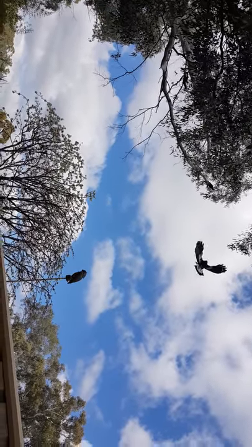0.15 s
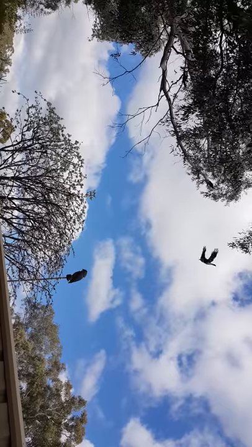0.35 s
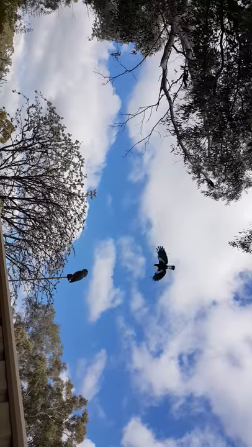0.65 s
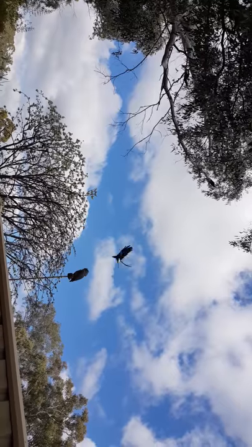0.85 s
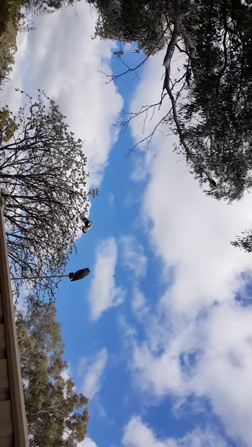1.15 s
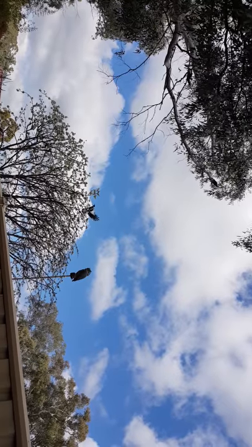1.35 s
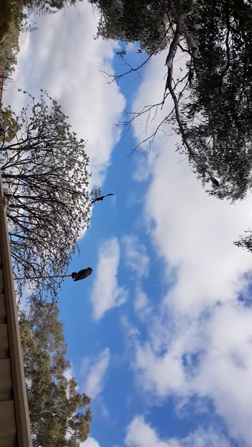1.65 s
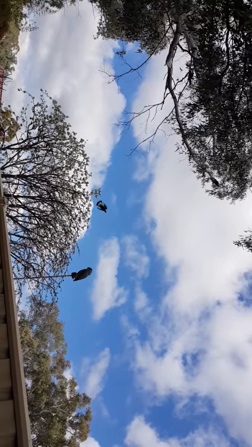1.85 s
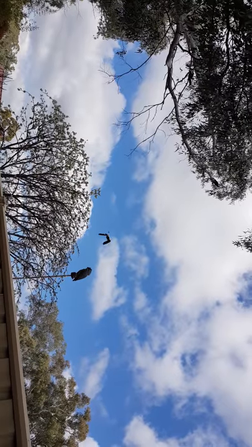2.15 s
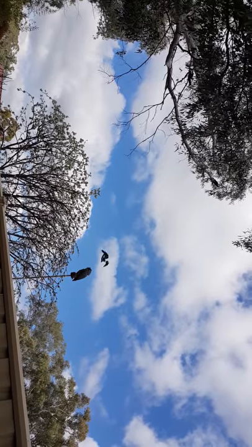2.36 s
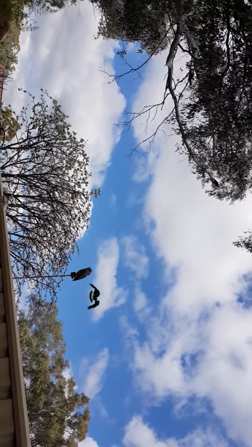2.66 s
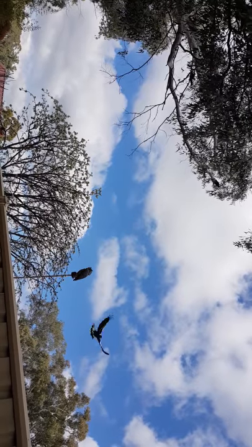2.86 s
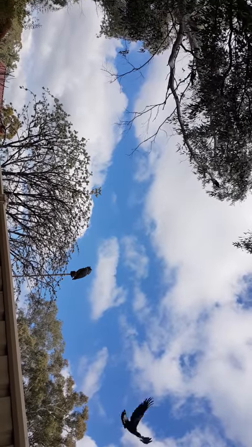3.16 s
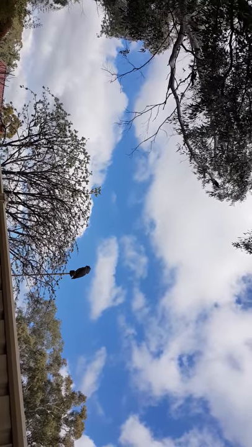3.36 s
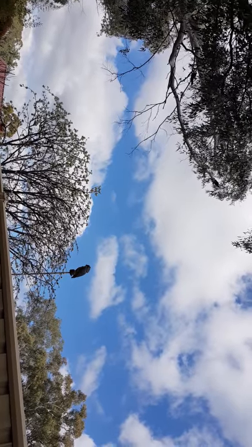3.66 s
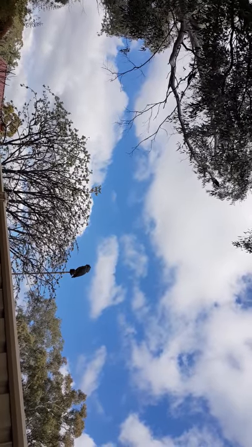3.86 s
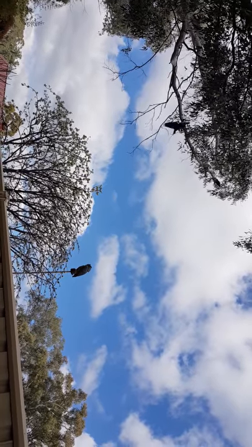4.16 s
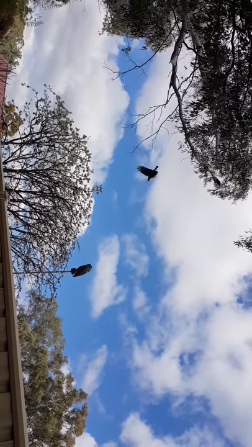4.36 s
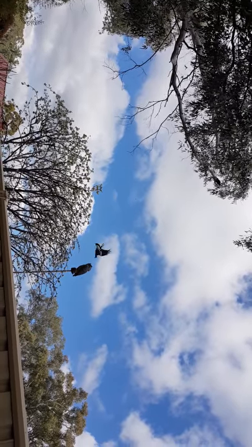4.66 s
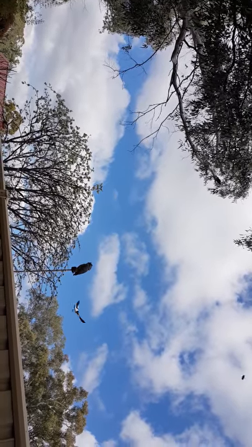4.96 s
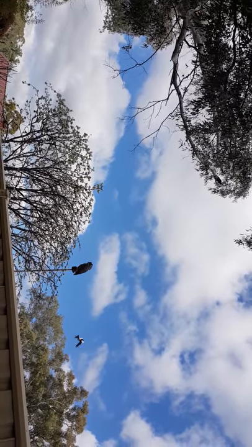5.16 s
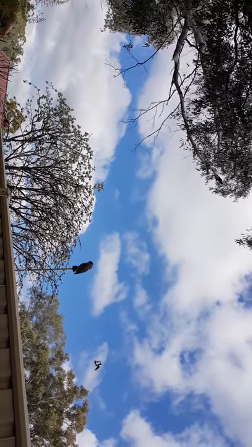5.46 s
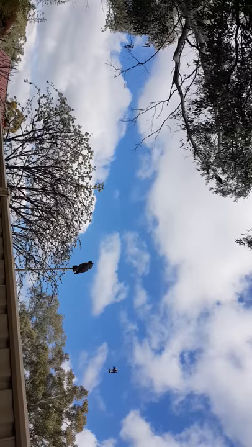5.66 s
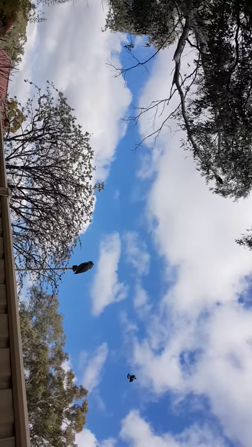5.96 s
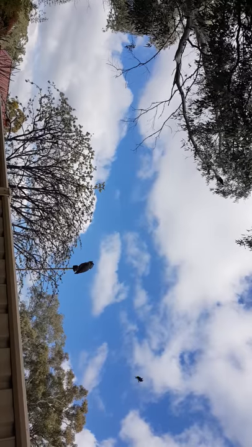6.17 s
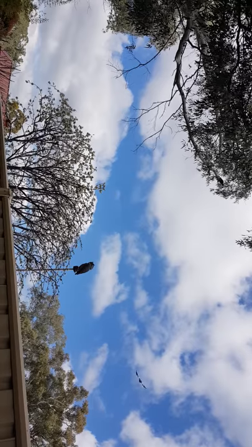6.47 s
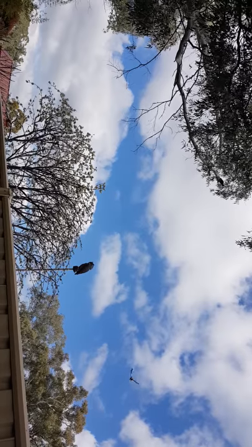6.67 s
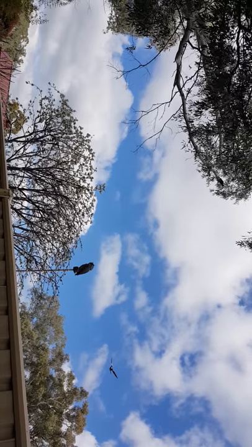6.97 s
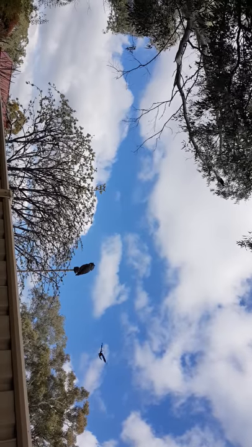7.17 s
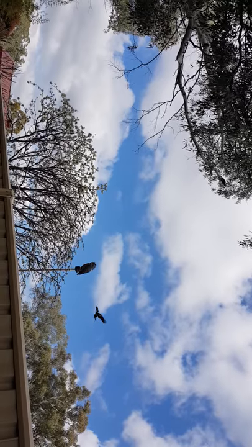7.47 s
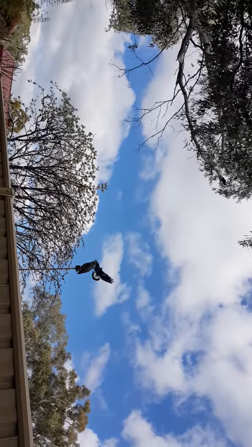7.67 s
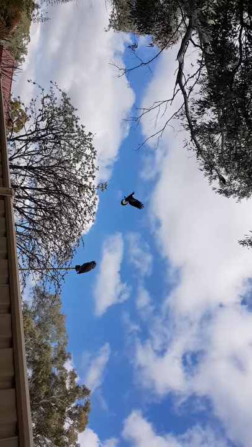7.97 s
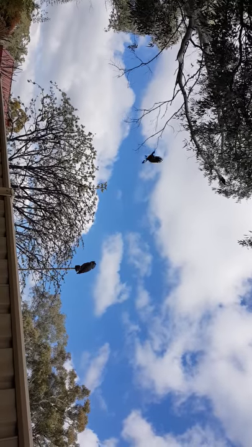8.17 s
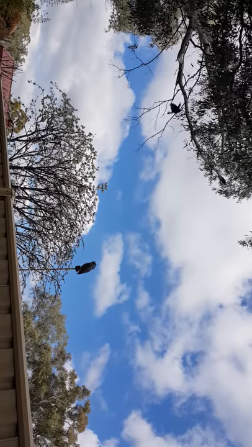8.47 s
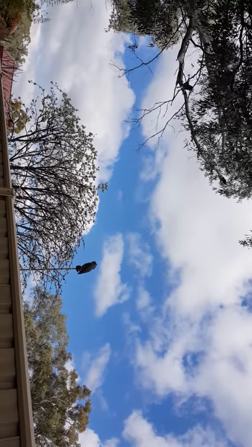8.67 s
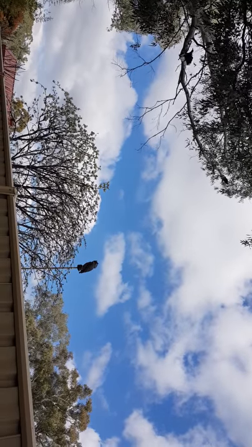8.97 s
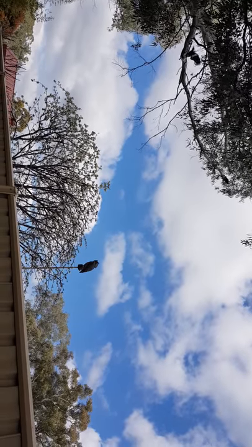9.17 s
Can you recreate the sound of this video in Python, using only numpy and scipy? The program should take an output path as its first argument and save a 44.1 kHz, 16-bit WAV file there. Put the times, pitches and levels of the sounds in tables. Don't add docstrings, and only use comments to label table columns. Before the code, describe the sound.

A suburban backyard with magpies swooping at a decoy, about nine seconds. A harsh call is already sounding at the start, with a higher answer at 0.3. Raspy, fluttering scolds near 1 kHz follow at 0.8 and 1.2, then a tangle of short wailing whistles and rough squawk from 1.6 to 2.1. A beak snaps on the left at 2.6; strong calls come at 2.7 and, loudest, 3.2, with another at 3.5. More scolds run from 4.3 to 5.8, with low wind puffs around 4.9 to 5.9. A clearer call at 5.9 overlaps a small bird's dry ticking until 6.4; longer, lower calls follow at 6.4 and 6.8, and ticking returns at 7.1. A dull beak clap at 7.8 leads into overlapping scolds until 8.7, then mostly quiet traffic hum, with tiny ticks near 9.1. Light echoes from houses and trees surround the calls.

```python
import sys
import numpy as np
from scipy import signal
from scipy.fft import rfft, irfft
from scipy.io import wavfile
from scipy.ndimage import uniform_filter1d

SR = 44100
rng = np.random.default_rng(int(sys.argv[2]) if len(sys.argv) > 2 else 0)


def bounce(signal):
    frames = np.transpose(np.atleast_2d(signal))
    limited = np.clip(frames, -1, 1)
    pcm = np.round(limited * 32767).astype(np.int16)
    wavfile.write(sys.argv[1], SR, pcm)


def boost_factor(decibels):
    exponent = np.asarray(decibels, float) / 20
    return 10 ** exponent


N = 410995
CUTOFF_HZ = 17200


def rms_one(x):
    return x / np.sqrt(np.mean(x ** 2) + 1e-20)


def at_hz(points, hz):
    table_hz, value = np.array(points)[:, 0], np.array(points)[:, 1]
    return np.interp(np.log(hz), np.log(table_hz), value)


def in_time(rows, t):
    time_s, *columns = np.transpose(rows)
    return [np.interp(t, time_s, c) for c in columns]


def drift(rate_hz, size, count=1):
    r = np.exp(-40 * np.pi * rate_hz / SR)
    coarse = rng.standard_normal((count, max(size, SR // 2) // 20 + 502))
    slow = signal.lfilter([1], [1, -2 * r, r * r], coarse)
    slow = slow[:, 500:size // 20 + 502]
    at = np.arange(size) / 20
    return np.array([np.interp(at, np.arange(len(row)), rms_one(row)) for row in slow]).squeeze()


def band(x, lo_hz, hi_hz):
    return signal.sosfilt(signal.butter(2, [lo_hz, hi_hz], "band", fs=SR, output="sos"), x)


def high(x, order, hz):
    return signal.sosfilt(signal.butter(order, hz, "high", fs=SR, output="sos"), x)


def low_pass(x, order, hz):
    return signal.sosfilt(signal.butter(order, hz, fs=SR, output="sos"), x)


def shaped_noise(spectrum, channels):
    hz = np.fft.rfftfreq(N, 1 / SR) + 1
    return rms_one(irfft(rfft(rng.standard_normal((channels, N))) * boost_factor(at_hz(spectrum, hz)), N))


def add(out, x, start_s, pan_db=0, lag=0, reach=500):
    treble = high(x, 3, 3000)
    for side, sign in enumerate((1, -1)):
        first = round(start_s * SR) + max(round(sign * lag), 0)
        delays = [0, *rng.integers(40, int(reach), 3)]
        scattered = boost_factor(-5) * rng.choice([-1, 1], (3, 1)) * treble
        for delay, sound in zip(delays, [x, *scattered]):
            i = first + delay
            out[side, i:i + len(x)] += boost_factor(sign * pan_db / 2) * sound[:N - i]


def fades(t, rise_s, fall_s):
    rise = np.clip((t - t[0]) / rise_s, 0, 1) if t[0] > 0 else 1
    return rise * np.clip((t[-1] - t) / fall_s, 0, 1)


# start_s, length_s, crest_db, crest_hz, arch_depth_hz
ARCHED = [
    (0.845,0.22,-21,1064,53),
    (1.235,0.19,-23.5,1074,18),
    (1.982,0.19,-21,1070,26),
    (2.74,.19,-16,1093,67),
    (3.164,0.19,-12.5,1104,22.5),
    (4.339,0.15,-22.5,1038,-40),
    (4.654,.19,-23,971,15.5),
    (5.011,0.26,-21,1029,22.5),
    (6.441,.27,-24.5,979.4,22.5),
    (8.083,0.23,-20.5,998,45.5),
]
# start_s, length_s, crest_db, from_hz, to_hz
FALLING = [(-.11,.2,-22,1171,1054),(0.284,0.16,-28,1319,1075),(1.25,0.2,-34.5,1291,1181),(1.58,0.21,-37,1017,748),(3.518,0.24,-25.5,980.6,964.4),
           (5.308,0.31,-32.5,993.6,840.4),(5.469,0.29,-33,1024,952),(6.829,.31,-33.5,1015,860),(7.817,0.24,-28,956,910),(8.309,0.24,-28,927.6,888),(8.566,0.18,-34,823,764)]
# start_s, length_s, crest_db, from_hz, to_hz
FADING = [
    (0,0.068,-26,956,892),
    (.285,0.12,-29,1580,1294),
    (.83,0.16,-29,956,802),
    (3.18,.21,-26.5,940,806),
    (6.2,0.32,-42,999,983),
    (8.04,0.31,-30.5,998,791),
    (3.97,0.3,-57,985,964),
]
# start_s, length_s, crest_db, from_hz, to_hz
LEAD_IN = [
    (.69,0.15,-37.5,1045,975),
    (1.2,0.071,-44,980,909),
    (3.09,0.11,-35,981,1037),
    (4.275,.07,-47,886,1000),
    (4.61,0.052,-38,888,978),
]
# start_s, length_s, crest_db, from_hz, to_hz
CLEAR = [
    (5.94,.265,-29.5,1051,989.6),
]
# flutter_per_s, shake_depth, upper_overtones_db, top_hiss_db, beak_resonance_hz
ARCHED_VOICE = [(117.8,0.573,-8.5,-39,4320),(114.1,0.55,-9,-48,4300),(127,0.62,-6.5,-21,4180),(124.6,0.63,-8.5,-18.5,4310),(135.7,0.757,-10,-23,4430),
                (142.3,0.71,-12,-23,4450),(135.3,0.53,-6.5,-37,4370),(127,0.61,-6.5,-27,4380),(128.1,0.6,-5.5,-25,4400),(127,0.65,-6.5,-27,4520)]
FALLING_VOICE = [(137.8,0.55,-4.5,-18.5,4610),(128.5,0.86,-4.5,-24.5,4570),(129.6,1,1,-13.5,4480),(146.3,0.59,1.5,-3,4440),(134,0.53,-4.5,-20,4410),
                 (142.6,0.64,-1.5,-19,4370),(117.8,0.61,-12.5,-41,4700),(159,0.69,-3.5,-17.5,4110),(135.2,0.57,-4.5,-23.5,4230),(124.46,0.58,-3,-20,4260),(129.3,0.74,1,-18,3900)]
FADING_VOICE = [(150,0.83,-5,-20,4550),(123,1,-26,-52,6400),(130.8,0.91,3,-15.5,3630),(134.7,0.68,0,-20,5000),(161,0.52,-10.5,-49,4400),(123.4,0.88,1.5,-8.5,3800),(127,0.79,-22,-38,4200)]
LEAD_IN_VOICE = [(169,0.61,-6.5,-15,4760),(138,1,-6,-65,4050),(181,0.61,-7.5,-24,4070),(144,1,-7.5,-37,3360),(136.5,0.76,-1,-28,4000)]
CLEAR_VOICE = [(120.7,0.32,-13,-24.5,4650)]
# beak_opens_from_below_hz, upper_tilt_db, top_hiss_tilt_db, third_partial_db
ARCHED_SWEEP = [(800,-1.5,-7,-0.5),(100,0,0.5,-0.5),(200,-1,-1.5,0.5),(200,1,2,-1.5),(200,0,-2,1),(200,2,11,1.5),(-300,0,3,-3),(500,1,4,8),(900,-3.5,-2.5,-1),(205,-3.5,-5,0)]
FALLING_SWEEP = [(100,1.9,5,-4.5),(100,0.5,23,0.5),(100,1.3,18,-0.5),(100,0.78,8.5,-3.5),(-200,-0.24,2.5,-3),(101,-0.41,-3,3),(105,0.14,-2,-1.5),(202,-0.012,-1.5,2),(-200,-1,-4,-2.5),(-200,0.5,1.5,-1.5),(102,1.1,3.5,4)]
FADING_SWEEP = [(100,0.5,0.45,4),(100,0.5,0.5,-9),(100,0.43,0.5,1),(100,1,0.5,0.5),(100,0.5,0.5,0.5),(100,0.66,0.5,3),(100,0.5,0.65,0.5)]
LEAD_IN_SWEEP = [(-300,0.38,0.71,0.69),(100,0.5,0.5,0.5),(100,0.5,0.5,0.5),(100,0.5,0.5,0.5),(100,-2.9,-2,0.46)]
CLEAR_SWEEP = [(102,-0.73,2.6,-1.7)]
# share_of_length, level_db against the crest
ARCHED_BREATH = [(0,-13),(.25,-3),(0.631,-2),(0.869,-4.5),(1,-7)]
FALLING_BREATH = [(0,-8),(0.222,-2.5),(.52,3.5),(0.842,-2),(0.998,-16)]
FADING_BREATH = [(0,2.5),(.15,-1.5),(.3,-1),(.75,-6),(1,-13)]
LEAD_IN_BREATH = [(0,-24),(.28,-1),(.7,6.5),(.9,5),(1.002,15)]
CLEAR_BREATH = [(0,-8.5),(.38,3.5),(0.55,2),(.88,1.5),(1,-16)]
# shoulder_share, shoulder_db, last_hold_share, last_hold_db
ARCHED_LEAN = [(0.4,-2,0.77,-0.5),(0.239,-2,0.79,-0.5),(0.24,-6.5,0.76,-3.5),(0.25,-4,.9,-2.5),(0.33,-4.5,.9,-3.5),(0.155,-4,0.736,-4.5),(0.164,0.5,.82,-2),(0.26,-5.5,0.8,-3),(0.26,-4,.85,-3),(.25,-2.5,0.81,-1.5)]
FALLING_LEAN = [(.22,-2,.86,-1.1),(0.246,0.5,.88,-1),(0.23,2.5,.85,-4.5),(0.36,-1.5,.85,-3.5),(0.45,0.5,0.96,-2.2),(0.305,3,.88,-1),(0.218,6,.92,1),(0.301,2.5,.9,-0.5),(.3,0,.86,0),(0.274,1,.85,0.2),(0.24,1.5,.88,2)]
# start_db, crest_share
ARCHED_ONSET = [(-6,0.58),(-19,.6),(-13,0.625),(-18,.6),(-13,0.61),(-12,0.58),(-11,0.44),(-21,0.71),(-16,0.6),(-10,0.66)]
FALLING_ONSET = [(-11,0.66),(-6,0.55),(-7,.52),(-1,0.36),(-10.5,0.67),(-9.5,.5),(-3,.55),(-7,.5),(-14.5,0.52),(-9,.55),(-2,.6)]
ARCHED_FIRST_DB = [-2,1,0.5,-3.5,-2,0.5,-2.5,2,1,-1.5]
FALLING_FIRST_DB = [-1,-2.5,.5,-9.5,-2.5,1.5,-3,0.5,.5,-1.5,-2]
FADING_FIRST_DB = [-5.5,3,4.5,-2.5,-14,5,-14]
# time_s, left_over_right_db, left_lag_samples
FIRST_BIRD = [(0,1,1),(.69,1.5,-2),(.83,0,1),(1.2,0,0),(1.98,0,0),(2.74,-2,6),(3.09,-4,12),(3.165,-4,12),(3.18,-1,4),(3.97,-1,11),(4.34,-1,11),(4.61,0,3),(5.0,-.5,5),(5.94,-3,11),(6.2,-3,10),(6.44,-2.3,4),(8.04,1,-2),(8.086,-1,4)]
SECOND_BIRD = [(0,1,1),(.285,.5,1),(1.25,0,0),(1.58,0,-1),(3.52,1,-8),(5.31,.3,-4),(5.47,1,12),(6.83,1.3,-3),(7.82,1.5,-1),(8.31,-.5,-7),(8.565,3,-10)]


def scolding():
    out = np.zeros((2, N))
    arch_returns = 0.393
    arched = [(s, length, db, hz - depth, hz, hz - arch_returns * depth) for s, length, db, hz, depth in ARCHED]
    clear = [(*row, row[-1]) for row in CLEAR]
    arched_breaths = [leaning(ARCHED_BREATH, *own) for own in zip(ARCHED_LEAN, ARCHED_ONSET)]
    falling_breaths = [leaning(FALLING_BREATH, *own) for own in zip(FALLING_LEAN, FALLING_ONSET)]
    fading_breaths = [FADING_BREATH] * len(FADING)
    lead_in_breaths = [LEAD_IN_BREATH] * len(LEAD_IN)
    same = np.zeros(9)
    kinds = [
        (arched, ARCHED_VOICE, arched_breaths, ARCHED_SWEEP, -10, ARCHED_FIRST_DB, FIRST_BIRD),
        (slides(FALLING), FALLING_VOICE, falling_breaths, FALLING_SWEEP, -9, FALLING_FIRST_DB, SECOND_BIRD),
        (slides(FADING), FADING_VOICE, fading_breaths, FADING_SWEEP, -10.5, FADING_FIRST_DB, FIRST_BIRD),
        (slides(LEAD_IN), LEAD_IN_VOICE, lead_in_breaths, LEAD_IN_SWEEP, -7.5, same, FIRST_BIRD),
        (clear, CLEAR_VOICE, [CLEAR_BREATH], CLEAR_SWEEP, -8.5, same, FIRST_BIRD)]
    for rows, voices, breaths, sweeps, kind_db, own_db, flight in kinds:
        for row, voice, breath, sweep, lean_db in zip(rows, voices, breaths, sweeps, own_db):
            flutter, shake, *colour = voice
            first_db = kind_db + lean_db + 15 * (row[4] / 1000 - 1)
            flutter_end = flutter * (1 - 0.1008)
            path = course(breath, *row)
            sound = call(path, flutter, flutter_end, shake, 0.044 * shake, first_db, *colour, *sweep)
            pan_db, lag = in_time(flight, row[0])
            add(out, sound, max(row[0], 0), pan_db, lag)
    return out


def slides(rows):
    return [(s, length, db, a, (a + b) / 2, b) for s, length, db, a, b in rows]


def leaning(breath, lean, onset):
    start_db, crest_share = onset
    return [(0, start_db), lean[:2], (crest_share, breath[2][1]), lean[2:], breath[4]]


def course(breath, start_s, length_s, crest_db, from_hz, crest_hz, to_hz):
    share, under_db = np.transpose(breath)
    tone_hz = [from_hz - 55.9, from_hz, crest_hz, to_hz, to_hz - 57.7]
    return np.transpose([start_s + length_s * np.sort(share), tone_hz, crest_db + under_db])


# pitch_hz, level_db
THROAT = [(1300,-7.5),(1600,4.5),(2200,3.5),(2420,-5),(3200,-15),(3700,-16.5),(5500,-18),(7000,-20.5),(8300,-36),(9800,-33),(12000,-34.5),(14000,-42),(15800,-45)]
# time_s, hiss_top_hz
TOP_EDGE = [(0,14800),(.285,13900),(.84,14700),(1.6,14000),(2.0,14800),(2.74,15400),(3.17,14700),(3.52,13000),(4.65,13500),(5.0,12200),(5.3,14100),(5.94,14600),(6.44,12200),(6.83,12200),(7.82,14300),(8.31,14100),(8.56,13000)]


def call(path, flutter_from, flutter_to, shake, hoarse, first_db, upper_db, top_db, beak_hz,
         opens_hz, upper_tilt_db, top_tilt_db, third_db):
    t = np.arange(max(path[0][0], 0), path[-1][0], 1 / SR)
    along = np.linspace(0, 1, len(t))
    hoarse = min(hoarse, 0.04)
    tone_hz, level_db = uniform_filter1d(in_time(path, t), size=SR // 70, mode="nearest")

    flutter_hz = np.linspace(flutter_from, flutter_to, len(t)) * (1 + 0.0514 * drift(28.7, len(t)))
    flutter = 2 * np.pi * np.cumsum(flutter_hz) / SR
    swing = np.cos(flutter) + 0.091 * np.cos(2 * flutter + 4.4)
    unsteady = hoarse * (0.25 * drift(30, len(t)) + 0.28 * drift(250, len(t)))
    steady_hz = tone_hz * (1 + unsteady)
    shaken_hz = shake * flutter_hz * swing

    k = np.arange(1, 15)[:, None]
    partial_hz = k * (steady_hz + shaken_hz)
    beak_now_hz = beak_hz - opens_hz * (1 - along) ** 2
    beak_db = 14 / (1 + ((partial_hz - beak_now_hz) / 300) ** 2)
    patchy_db = np.minimum(0.33 * k, 3.5) * drift(110, len(t), count=14)
    gain = boost_factor(at_hz(THROAT, partial_hz) + beak_db + patchy_db) * (partial_hz < CUTOFF_HZ)
    gain[0] = boost_factor(first_db + patchy_db[0])
    gain[2] *= boost_factor(third_db)
    turn, shaken = 2 * np.pi * np.cumsum([steady_hz, shaken_hz], axis=1) / SR
    phase = k * turn + k ** 0.89 * shaken + rng.uniform(0, 2 * np.pi, k.shape)
    partials = gain * np.sin(phase)

    low = rms_one(partials[:2].sum(0))
    rasp = rms_one(band(rng.standard_normal(SR // 2)[:len(t)], beak_hz - 600, beak_hz + 1300))
    upper = rms_one(rms_one(partials[2:8].sum(0)) + 4.5 * hoarse * rasp)
    hiss = rms_one(band(rng.standard_normal(SR // 2)[:len(t)], 7500, 14700))
    top = rms_one(rms_one(partials[8:].sum(0)) + 0.74 * hiss)
    top = rms_one(low_pass(top, 6, in_time(TOP_EDGE, t[0])[0]))

    effort_db = level_db - level_db.max()
    voice = low + boost_factor(upper_db + 0.34 * effort_db + upper_tilt_db * (2 * along - 1.5)) * upper
    voice += boost_factor(top_db + 1.0 + 0.55 * effort_db + top_tilt_db * (2 * along - 2)) * top
    throb = 1 + 0.27 * np.cos(flutter + 1.08)
    return boost_factor(level_db) * fades(t, 0.021, 0.008) * throb * voice


# start_s, length_s, start_hz, level_db, loud_overtone_db
WAILS = [
    (1.62,0.049,1800,-33.5,-3),
    (1.62,0.09,1584,-29.5,-10.5),
    (1.66,0.11,1289,-29.5,-11.5),
]
HELD = [
    (1.745,0.07,1197,-32,-3.5),
    (1.812,0.1,1258,-35,-16),
    (1.991,0.133,1426,-35.5,-17),
]
PIPS = [
    (1.607,0.056,1345,-34.5,-25),
    (1.925,0.053,876,-37,-0.5),
]
RASPS = [
    (1.695,0.077,2570,-26,-30),
    (1.7,0.076,3800,-31,-29),
    (1.69,0.068,1400,-28,-35),
]
LOUD_OVERTONE = [2,2,4,4,4,4,4,5,2,2,2]


def whistling():
    out = np.zeros((2, N))
    kinds = [(WAILS, -0.616, 0.012), (HELD, -0.12, 0.005), (PIPS, 0.35, 0.007), (RASPS, -0.47, 0.02)]
    notes = [(glide, rough, *row) for rows, glide, rough in kinds for row in rows]
    for (glide, rough, s, length, hz, level_db, loud_db), order in zip(notes, LOUD_OVERTONE):
        to_hz = hz * (1 + glide * length)
        add(out, whistle(s, s + length, hz, to_hz, rough, level_db, loud_db, order), s, -1.0, lag=-8)
    return out


def whistle(start_s, end_s, from_hz, to_hz, rough, level_db, loud_db, order):
    t = np.arange(start_s, end_s, 1 / SR)
    hz = np.linspace(from_hz, to_hz, len(t)) * (1 + rough * drift(170, len(t)))
    turn = 2 * np.pi * np.cumsum(hz) / SR
    tone = np.sin(turn) + boost_factor(loud_db - 1) * (np.sin(2 * turn) + 0.22 * np.sin(3 * turn))
    tone += boost_factor(loud_db) * np.sin(order * turn)
    faint = sum(np.sin(k * turn) for k in range(6, 12) if k * from_hz < 14000)
    tone += boost_factor(-30 + 0.5 * loud_db + 4 * drift(40, len(t))) * faint
    return boost_factor(level_db) * fades(t, 0.0086, 0.0047) * tone


# start_s, peak_db, bright_edge_db, left_over_right_db
SNAPS = [
    (2.579, -23.5, -8, 7),
    (4.0128, -38, -3, 11),
    (7.7661, -20, -25, 1),
    (8.8096, -38, -4, -9),
    (9.1192, -79, -42, -39),
]


def beak_snaps():
    out = np.zeros((2, N))
    for s, peak_db, top_db, pan_db in SNAPS:
        add(out, boost_factor(peak_db) * snap(top_db), s, pan_db, reach=190)
    return out


def snap(top_db):
    t = np.arange(int(0.02 * SR)) / SR
    crack = rng.standard_normal(len(t))
    modes = [(1350, 0.8), (2100, 1.0), (3600, 0.6), (4300, 0.6), (5800, 0.4)]   # Hz, strength
    body = sum(np.sin(2 * np.pi * hz * t) * g for hz, g in modes) * np.exp(-t / 0.0013)
    edge = rms_one(band(crack, 4200, 16500)) * np.exp(-t / 0.0005)
    body_share = np.clip(1 - boost_factor(top_db), 0.05, 1)
    return body / np.abs(body).max() * body_share + boost_factor(top_db) * 0.5 * edge


# start_s, peak_db
CHATTER = [(2.6459, -48), (2.6953, -47), (4.0946, -49), (4.133, -49), (4.185, -49), (4.564, -41),
           (5.9673, -40), (6.0016, -35), (6.045, -31), (6.088, -36), (6.135, -35), (6.1767, -32),
           (6.214, -33.5), (6.251, -34), (6.2807, -36), (6.3061, -39), (6.3403, -39), (6.3674, -40),
           (6.4103, -44), (7.1448, -33), (7.1811, -33), (7.2027, -34.5), (7.2325, -42), (7.2656, -45),
           (7.2844, -43), (7.3198, -45), (7.3444, -47), (7.53, -50), (7.6944, -61), (9.0329, -49),
           (9.085, -45), (9.1196, -39.5)]


def chatter():
    out, t = np.zeros((2, N)), np.arange(int(0.037 * SR)) / SR
    for s, peak_db in CHATTER:
        hz = 3750 * (1 + 0.015 * rng.standard_normal())
        tick = np.sin(2 * np.pi * hz * t) * t / 0.0004 * np.exp(1 - t / 0.0004)
        ring = 0.12 * rms_one(band(rng.standard_normal(len(t)), 3450, 4050)) * np.exp(-t / 0.014)
        add(out, boost_factor(peak_db + 1.0) * (tick + ring), s, 1.0, reach=90.4)
    return out


# pitch_hz, ring_s
YARD_T60 = [(500,1),(1100,0.46),(2000,0.79),(5000,0.69),(7500,0.56),(12000,0.34)]


def yard(x):
    t = np.arange(int(1.5 * SR)) / SR
    edges = np.geomspace(500, 14000, 9)
    white = rng.standard_normal((2, len(t)))
    tail = np.zeros((2, len(t)))
    for lo, hi in zip(edges, edges[1:]):
        tail += band(white, lo, hi) * boost_factor(-60 * t / at_hz(YARD_T60, np.sqrt(lo * hi)))
    tail *= np.clip((t - 0.01) / 0.035, 0, 1)
    tail *= boost_factor(2.0 * drift(20, len(t)))
    tail *= 1 + 0.096 * np.exp(-((t - 0.17) / 0.36) ** 2)
    tail /= np.sqrt(np.sum(tail ** 2) / 2)
    stirred = x.mean(0) * (0.55 + 0.83 * drift(45, N, count=2))
    return signal.fftconvolve(stirred, tail, axes=1)[:, :N]


# pitch_hz, level_db per Hz
HUM = [(65, -6), (110, -3.5), (205, -9), (358, -2.5), (565, -3), (872, 0.5), (1240, -6), (1660, -3),
       (2210, -7), (3490, -3), (5740, -26), (8330, -27.5), (15500, -32)]
# pitch_hz, likeness (0 to 1)
LIKENESS = [(100,1),(500,0.57),(1500,0.032),(5000,0.041),(12000,.1)]
# time_s, level_db about its mean
TRAFFIC = [(0,5.5),(.5,4.5),(.78,-4),(1.6,4),(3.3,-0.5),(4.0,-4.5),(4.35,-9),(4.7,1.5),(7.3,-4),(8.3,-1),(9.32,-4)]


def suburban_hum(t):
    traffic_db, = in_time(TRAFFIC, t)
    hz = np.fft.rfftfreq(N, 1 / SR) + 1
    alike = np.clip(at_hz(LIKENESS, hz), 0, 1)
    mid, side = rfft(shaped_noise(HUM, channels=2))
    sides = np.array([np.sqrt(1 + alike) * mid + sign * np.sqrt(1 - alike) * side for sign in (1, -1)])
    is_low = 1 / (1 + (hz / 340) ** 6)
    rumble, hum = irfft(sides * is_low, N), irfft(sides * (1 - is_low), N)
    hum /= np.std(band(hum.mean(0), 280, 834))
    hum *= boost_factor(1.2 * drift(3, N))
    rumble = rms_one(rumble) * boost_factor([[0.8], [-0.8]])
    return boost_factor(-61 + 0.57 * traffic_db) * hum + boost_factor(-60 + traffic_db) * rumble


# pitch_hz, level_db per Hz
WIND = [(12, -23), (20, -50), (38, -6), (76, 2), (143, -39), (182, -25), (250, -17.5), (320, -41),
        (550, -120)]
# time_s, wind_db
GUSTS = [(0,-74),(.18,-71),(.78,-97),(1.6,-69),(3.2,-71.5),(4.33,-91),(4.9,-51),(5.0,-59),(5.6,-61.5),(5.76,-54.5),(6.07,-66.5),(7.34,-72.5),(9.32,-70.5)]


def wind_on_ports(t):
    wind_db, = in_time(GUSTS, t)
    left, right = shaped_noise(WIND, channels=2) * boost_factor(2.0 * drift(8.3, N))
    return boost_factor(wind_db + 13.5) * np.array([left, boost_factor(-12) * (0.5 * left + 0.85 * right)])


# start_s, peak_db, pitch_hz
BUFFETS = [
    (0.189, -26, 157),
    (0.518, -33, 188),
    (1.94, -40.5, 127),
    (4.75, -32, 76),
    (4.883, -22, 81),
    (5.326, -29, 70.4),
    (5.718, -34, 127),
    (5.891, -32, 74.7),
]


def buffets():
    out, t = np.zeros(N), np.arange(int(0.15 * SR)) / SR
    shape = t / 0.023 * np.exp(1 - t / 0.016)
    for s, peak_db, hz in BUFFETS:
        thud = band(rng.standard_normal(2 * len(t)), 0.66 * hz, 1.44 * hz)[len(t):]
        i = round(s * SR)
        out[i:i + len(t)] += boost_factor(peak_db - 12.5) * shape * rms_one(thud)
    return out * boost_factor([[3.0], [-4.0]])


def scene():
    t = np.arange(N) / SR
    birds = scolding() + whistling() + chatter() + beak_snaps()
    nearness = 0.4 + uniform_filter1d(np.abs(birds.mean(0)), size=SR // 6) / 0.03
    echo = boost_factor(-13) * yard(birds * nearness ** -0.45)
    return birds + echo + suburban_hum(t) + wind_on_ports(t) + buffets()


def top_cut(x):
    return signal.sosfilt(signal.butter(12, 15740, fs=SR, output="sos"), x)


def record(dry):
    treble = high(dry, 2, 7500)
    chest = low_pass(dry, 1, 1300)
    ports = dry + treble * [[-0.35], [0.3]] + chest * [[0.12], [-0.12]]
    ports *= boost_factor([[-0.4], [0.4]])
    ports -= 0.49 * signal.lfilter(*signal.iirpeak(8100, 6.3, fs=SR), ports)
    ports = 0.75 * np.tanh(ports / 0.75)
    mix = signal.sosfilt(signal.cheby2(12, 70, CUTOFF_HZ, fs=SR, output="sos"), ports)
    return top_cut(mix)


dry = scene()
out = record(dry)
bounce(out)
```